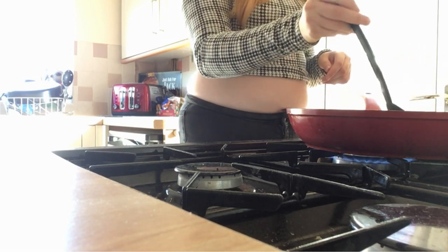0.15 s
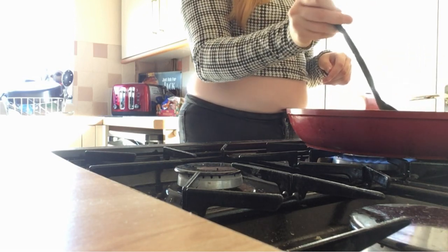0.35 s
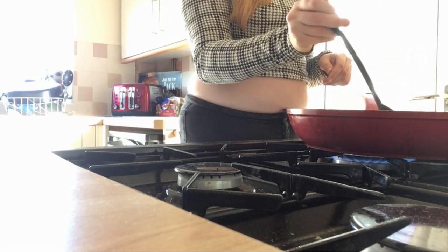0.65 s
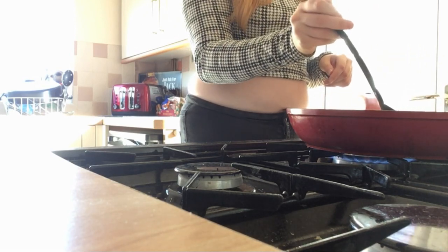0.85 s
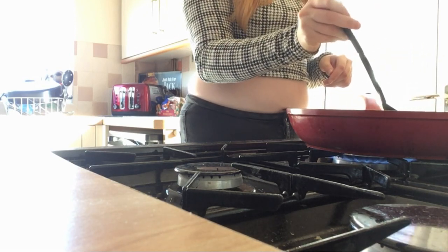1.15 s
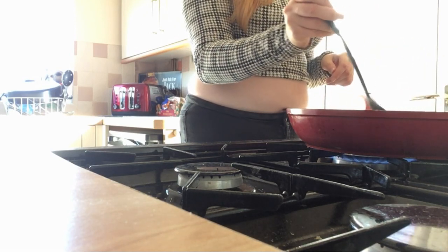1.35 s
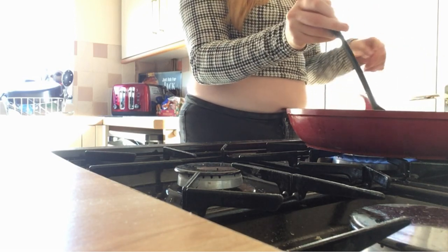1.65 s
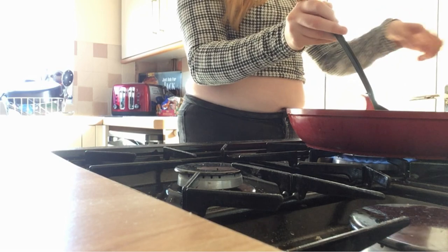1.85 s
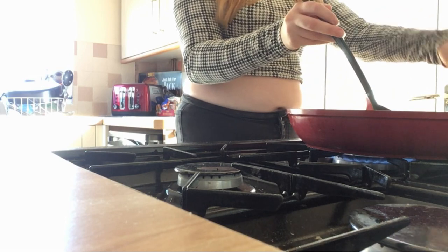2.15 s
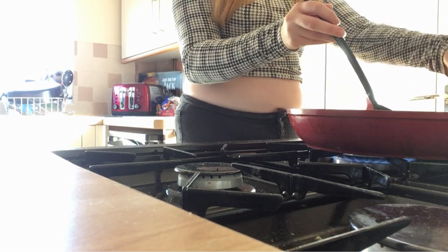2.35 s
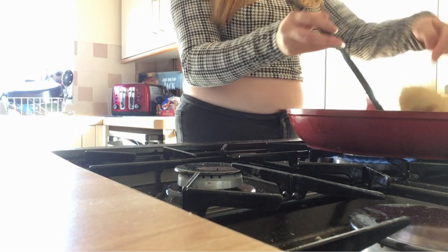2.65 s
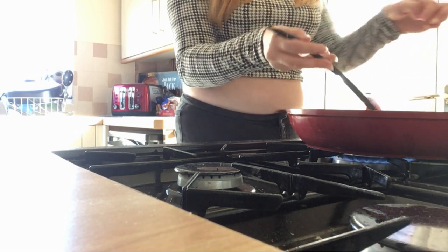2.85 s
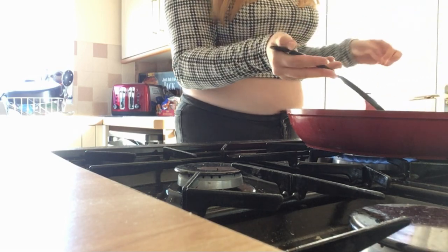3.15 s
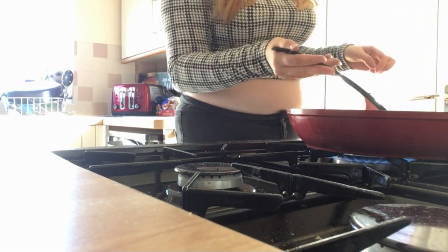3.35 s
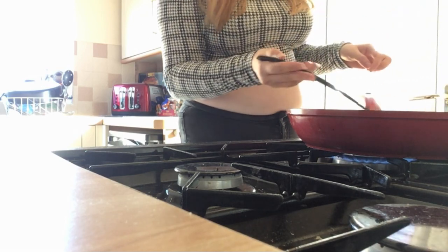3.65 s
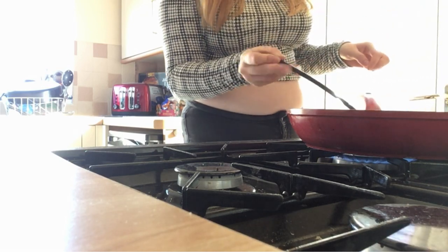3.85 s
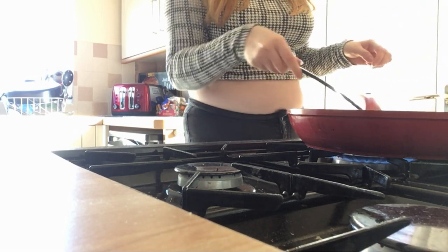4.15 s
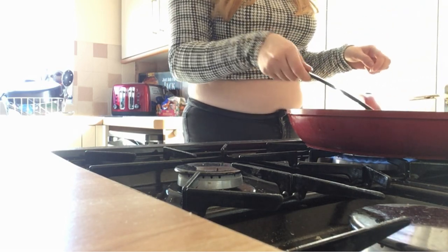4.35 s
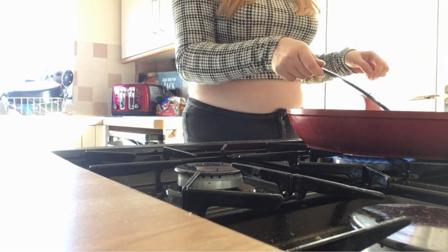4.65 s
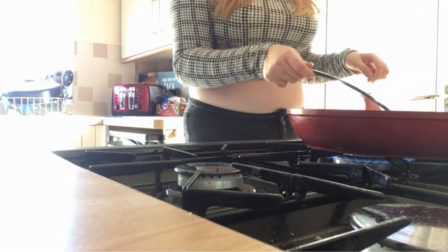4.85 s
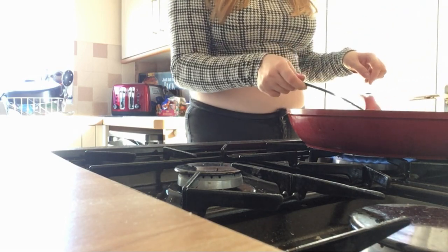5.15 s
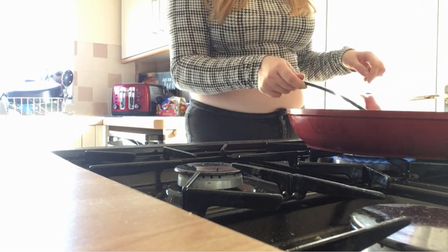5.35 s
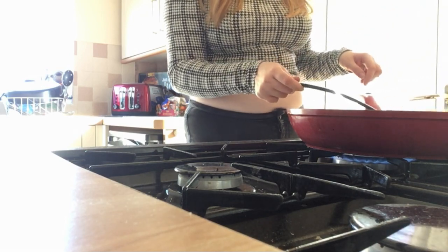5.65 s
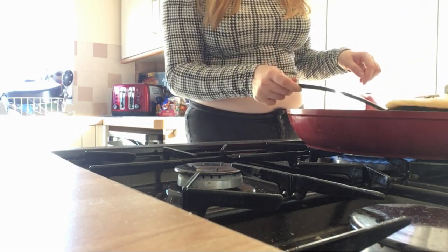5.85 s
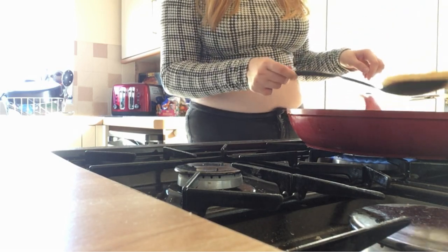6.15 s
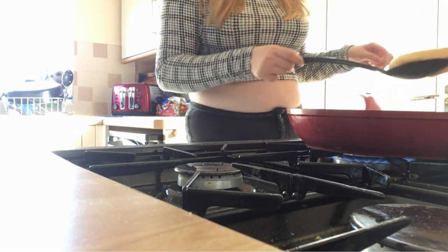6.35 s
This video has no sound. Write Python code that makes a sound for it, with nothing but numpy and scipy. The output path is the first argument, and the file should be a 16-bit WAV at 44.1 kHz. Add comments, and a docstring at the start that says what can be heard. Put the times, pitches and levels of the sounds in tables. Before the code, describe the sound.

Sparse metallic taps and two heavy clanks of a spatula on a pan, with faint scraping, above soft gas hiss and low hum.

```python
"""A gas burner hisses and rumbles and a motor hums throughout: filtered noise and wavering low tones.
A spatula rubs softly in a frying pan on the hob of a small kitchen: a spray of tiny slips, and one squeak.
It also knocks and taps the pan: each blow is a noise burst of the blade, a tick of its edge,
the damped modes of the pan and, when heavy, a thud of the iron grate under it."""
import sys
import numpy as np
from scipy import signal
from scipy.fft import rfft, irfft
from scipy.io import wavfile

SR = 44100
rng = np.random.default_rng(int(sys.argv[2]) if len(sys.argv) > 2 else 0)


def log_audio(samples):
    """Write samples as a 16-bit WAV file to the path given in sys.argv[1]."""
    # one column per channel
    frames = np.atleast_2d(samples).T
    # limit to full scale, then quantise
    limited = np.clip(frames, -1, 1)
    pcm = np.round(limited * 32767).astype(np.int16)
    wavfile.write(sys.argv[1], SR, pcm)


N = 287091
TIME, FREQS = np.arange(N) / SR, np.fft.rfftfreq(N, 1 / SR)  # s, Hz


def gain_of(db):
    """Decibels to amplitude."""
    return 10 ** (np.asarray(db) / 20)


def evened(x):
    """Scales to rms 1."""
    return x / np.sqrt(np.mean(x ** 2) + 1e-20)


def read(points, hz):
    """Interpolates a table on a log-frequency axis."""
    point_hz, value = np.transpose(points)
    return np.interp(np.log(hz + 1), np.log(point_hz + 1), value)


def add(mix, start_s, sound):
    """Mixes a sound in at its start time, cut at the end of the mix."""
    part = mix[round(start_s * SR):][:len(sound)]
    part += sound[:len(part)]


def noise(gain):
    """Steady noise of rms 1 with the given spectrum."""
    return evened(irfft(rfft(rng.standard_normal(N)) * gain, N))


def drift(rate_hz):
    """Slow random motion of rms 1."""
    return noise(np.exp(-(FREQS / rate_hz) ** 2))


def envelope(t, attack_s, hold_s, release_s):
    """Rises from t = 0, holds, and falls back to silence."""
    rise = np.clip(t / attack_s, 0, 1)
    fall = np.clip(1 - (t - attack_s - hold_s) / release_s, 0, 1)
    return rise * fall


# Rumble spectrum of the flame. Each row: frequency in Hz, relative density in dB per Hz.
RUMBLE_COLOUR = [(20, -27), (35, -35), (48, 5.5), (65, -11), (85, -5.5), (112, 2), (140, -3.5), (200, -11),
                 (255, -13), (300, -5.5), (380, -21.5), (600, -27.5), (2000, -48)]
# Hiss spectrum of the flame. Each row: frequency in Hz, relative density in dB per Hz.
FLAME_COLOUR = [(100, -13), (450, -3.5), (680, 0), (1050, -4.5), (1380, 1.5), (1900, -14), (2550, -19.5),
                (4400, -17.5), (6100, -24.5), (7300, -27), (10400, -29), (12000, -15), (14100, -40),
                (15600, -20.5)]
# Whistling resonances of the gas jet. Each row: centre in Hz, nominal width in Hz, relative peak in dB.
JET_RESONANCES = [(2994, 304, -6.5), (3390, 142, -3.5), (5237, 380, -12), (7030, 500, -14.5),
                  (7590, 240, -14.5), (8490, 310, -13), (9560, 1100, -17), (9810, 270, -8.5),
                  (10900, 115, -7.5), (11270, 320, -5.5), (12200, 510, -3.5), (13240, 180, -6.5),
                  (12300, 290, -34), (16200, 1150, -9)]


def burner(hiss_db=-58.5, rumble_db=-55, flutter_db=.5, flutter_hz=25):
    """Gas hisses through the jet's resonances over the soft roar and rumble of the flame."""
    power = gain_of(read(FLAME_COLOUR, FREQS)) ** 2
    for centre_hz, width_hz, db in JET_RESONANCES:
        detune = (FREQS - centre_hz) / (0.82 * width_hz)
        power = power + gain_of(db) ** 2 / (1 + detune ** 2) ** 3
    hiss = noise(np.sqrt(power)) * gain_of(hiss_db + flutter_db * drift(flutter_hz))
    rumble = gain_of(rumble_db) * noise(gain_of(read(RUMBLE_COLOUR, FREQS)))
    return hiss + rumble


# Motor and mains tones. Each row: frequency in Hz, level in dB rms, unsteadiness as a share of amplitude.
HUM_TONES = [(48.9, -60.5, 0.16), (99.8, -65, 0.23), (118.6, -65, 0.24), (167.1, -51.5, 0.12)]


def hum(waver_hz=9):
    """Low steady tones that waver a little in strength and phase."""
    out = np.zeros(N)
    for hz, db, unsteady in HUM_TONES:
        swing = 1 + unsteady * (drift(waver_hz) + 1j * drift(waver_hz))
        carrier = np.exp(2j * np.pi * (hz * TIME + rng.random()))
        out += gain_of(db) * evened((swing * carrier).real)
    return out


RESTING_DB = -74  # faint rub of the blade held in the pan
STROKE_ATTACK_S, STROKE_RELEASE_S, STROKE_SAG_DB_PER_S = 0.03, 0.086, 20
# Pushes of the blade under the food. Each row: start in seconds, length in seconds (attack and
# release set the minimum), level in dB before the sag.
STROKES_OF_BLADE = [(2.699, 0.1, -58.5), (2.85, 0.1, -59), (3.703, 0.18, -59), (4.02, 0.16, -64),
                    (4.351, 0.37, -63), (4.9, 0.63, -71.5)]


def pressure():
    """How hard the blade rubs: a light resting touch, and pushes that bite, ease off and stop."""
    level = gain_of(RESTING_DB) * np.ones(N)
    for start_s, length_s, db in STROKES_OF_BLADE:
        t = np.maximum(TIME - start_s, 0)
        hold_s = max(length_s - STROKE_ATTACK_S - STROKE_RELEASE_S, 0)
        shape = envelope(t, STROKE_ATTACK_S, hold_s, STROKE_RELEASE_S)
        level += gain_of(db - STROKE_SAG_DB_PER_S * t) * shape
    return level


# Spectrum of the sliding blade. Each row: frequency in Hz, relative density in dB per Hz.
SLIDE_COLOUR = [(100, -4), (400, 2.5), (700, 2), (1000, -4.5), (1350, 4.5), (1650, -1.5), (2200, -6),
                (3000, -20), (6000, -20.5), (16000, -22)]


def scrape(grains_per_s=900):
    """Tiny slips of uneven size as the blade slides over the pan."""
    slips = (rng.random(N) < grains_per_s / SR) * rng.standard_normal(N)
    rub = evened(irfft(rfft(slips) * gain_of(read(SLIDE_COLOUR, FREQS)), N))
    return rub * pressure()


def burst(gain, t, t60_s):
    """A brief chatter of contacts with the given spectrum: random in detail, near rms 1 at its start."""
    fade = gain_of(-60 * t / t60_s)
    # phases of fading noise gather the energy near the start
    phase = np.angle(rfft(rng.standard_normal(len(t)) * fade))
    chatter = irfft(gain * np.exp(1j * phase), len(t)) * np.sqrt(np.sqrt(fade))
    return chatter * np.linalg.norm(fade) / np.linalg.norm(chatter)


def ring(modes, t):
    """The dying modes of a struck body."""
    return sum(gain_of(db - 60 * t / t60_s) * np.sin(2 * np.pi * hz * t) for hz, db, t60_s in modes)


# Spectrum of the blade's edge. Each row: frequency in Hz, relative density in dB per Hz.
EDGE_COLOUR = [(200, -12), (1500, 3), (3200, -1), (3900, -1), (4500, 7.5), (5300, 2.5), (5850, 6),
               (6800, -2.5), (11000, -4), (16000, -12)]
# Modes of the pan's floor, damped by the food. Each row: frequency in Hz, relative level in dB, t60 in s.
FLOOR_MODES = [(629, -8.5, 0.2), (706.7, 1.5, 0.2), (697, -17.5, 0.56), (2090, -12, 0.1), (2144, -20, 0.11),
               (2135, -10, 0.066)]
# Modes of the pan's free wall. Each row: frequency in Hz, relative level in dB, t60 in seconds.
WALL_MODES = [(811, -6, 0.18), (843, -8.5, 0.19), (1297, -4, 0.17), (1325, -5.5, 0.24), (1339, -8, 0.27),
              (1462, 1, 0.04), (1550, -4, 0.049), (1660, -20, 0.11), (1834, -13, 0.099), (2010, -12, 0.079),
              (2280, -13.5, 0.084)]
# Modes of the iron grate. Each row: frequency in Hz, relative level in dB, t60 in seconds.
GRATE_MODES = [(46, -19, .6), (88.3, -6.5, 0.16), (244, -27, 0.067), (308, 1.5, 0.12), (310, -24, 0.048),
               (387, -5.5, 0.13), (579, -9, 0.17), (590, -26, .13), (1174, -29, 0.11)]


def knock(clack_db, low_hz, high_hz, floor_db, wall_db, grate_db, tick_db,
          clack_t60_s=0.032, tick_t60_s=0.048, rise_s=0.0013, tick_rise_s=0.0013, size=17640):
    """One blow: the dead clack of the blade with a tick of its edge, and the ring of pan and grate."""
    t, hz = np.arange(size) / SR, np.fft.rfftfreq(size, 1 / SR)
    # each blow's clack is noise between its own lower and upper edge
    band = 1 / np.sqrt((1 + (low_hz / (hz + 1)) ** 14) * (1 + (hz / high_hz) ** 20))
    push = 1 - np.exp(-(t / rise_s) ** 2)  # the force builds up over a millisecond
    clack = gain_of(clack_db) * burst(band, t, clack_t60_s)
    tick = gain_of(tick_db) * burst(gain_of(read(EDGE_COLOUR, hz)), t, tick_t60_s)
    tick = tick * (1 - np.exp(-t / tick_rise_s))
    floor = gain_of(floor_db) * ring(FLOOR_MODES, t)
    wall = gain_of(wall_db) * ring(WALL_MODES, t)
    grate = gain_of(grate_db) * ring(GRATE_MODES, t)
    return push * clack + tick, push * (floor + wall + grate)


# Blows of the spatula. Each row: start in seconds, blade clack in dB, lower and upper edge of the clack
# in Hz, pan floor in dB, pan wall in dB, grate thud in dB, edge tick in dB.
BLOWS = [(0.6050, -38.5, 860, 1980, -39.5, -37.5, -55, -61),
         (1.4972, -31, 1140, 2180, -43, -39, -72, -52.5), (1.546, -45, 1290, 2180, -46.5, -49, -70, -75),
         (2.791, -28.5, 500, 1350, -43, -40, -50, -47.5), (2.874, -47, 600, 2010, -57, -64, -75, -72),
         (3.7756, -34, 1200, 2400, -52, -45, -74, -35), (3.7786, -23, 764, 800, -27.5, -31.5, -34.5, -47),
         (3.946, -56, 800, 3000, -75, -58, -77, -59.5), (4.085, -57, 1000, 2800, -62, -60, -66, -60),
         (5.2523, -34.5, 1900, 3260, -50, -58, -54, -45), (5.2531, -20, 490, 1280, -25, -45, -27, -44)]


def spatula_blows():
    """All blows, as the sound of the blade and that of the struck metal."""
    blade, metal = np.zeros(N), np.zeros(N)
    for start_s, *blow in BLOWS:
        clack, clang = knock(*blow)
        add(blade, start_s, clack)
        add(metal, start_s, clang)
    return blade, metal


SQUEAK_START_S, SQUEAK_HZ, SQUEAK_RISE_HZ_PER_S, SQUEAK_DB = 4.12, 476, 23, -58.5
SQUEAK_ATTACK_S, SQUEAK_HOLD_S, SQUEAK_RELEASE_S = 0.035, 0.093, 0.1


def squeak():
    """Regular stick and slip of the pushed blade: one faint, even tone that creeps upward."""
    t = TIME - SQUEAK_START_S
    level = gain_of(SQUEAK_DB) * envelope(t, SQUEAK_ATTACK_S, SQUEAK_HOLD_S, SQUEAK_RELEASE_S)
    cycles = np.cumsum(SQUEAK_HZ + SQUEAK_RISE_HZ_PER_S * t) / SR
    return level * np.sin(2 * np.pi * cycles)


# Reverberation of the room. Each row: frequency in Hz, t60 in seconds.
ROOM_DECAY = [(100, 0.75), (700, 0.28), (2000, 0.29), (6000, 0.32), (15000, 0.19)]


def kitchen(x, wet_db, first_s=.005, size=22050):
    """Worktop, tiles and cupboards return a short, dense tail."""
    hz, t, z = signal.stft(rng.choice([-1., 1.], size), SR, nperseg=256)
    fade = gain_of(-60 * t / read(ROOM_DECAY, hz)[:, None])
    tail = signal.istft(z * fade, SR, nperseg=256)[1]
    tail = np.concatenate([np.zeros(round(first_s * SR)), tail])
    return x + gain_of(wet_db) * signal.fftconvolve(x, tail / np.linalg.norm(tail))[:N]


def scene():
    """Spatula and pan in the room, over the burner and the hum."""
    background = burner() + hum()
    blade_blows, metal_blows = spatula_blows()
    blade = scrape() + blade_blows
    pan = squeak() + metal_blows
    # the blade's sounds get more room tail than the ringing metal and the squeak
    return (kitchen(blade, wet_db=-4.5) + kitchen(pan, wet_db=-8.5) + background)[None]


EDGE_HZ = 15800


def record(dry):
    """Band limit: a linear-phase low-pass at EDGE_HZ."""
    lowpass = signal.firwin(511, EDGE_HZ, window=("kaiser", 9), fs=SR)
    return signal.oaconvolve(dry, lowpass[None], "same")


dry = scene()
out = record(dry)
log_audio(out)
```